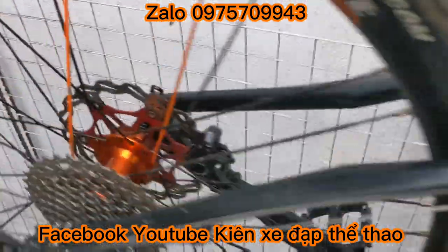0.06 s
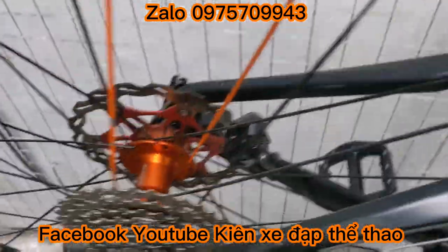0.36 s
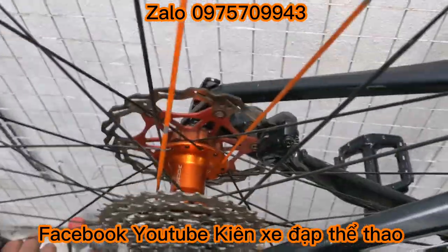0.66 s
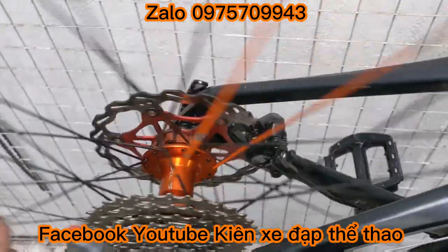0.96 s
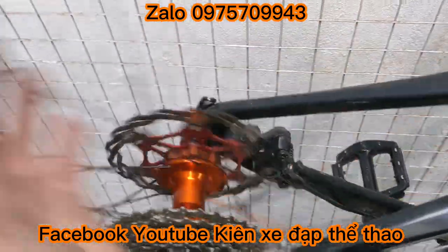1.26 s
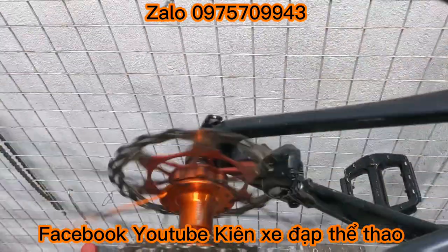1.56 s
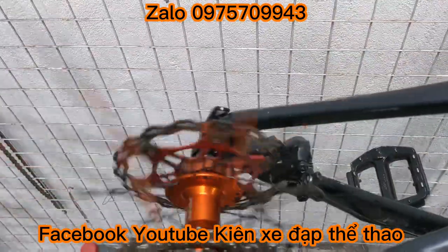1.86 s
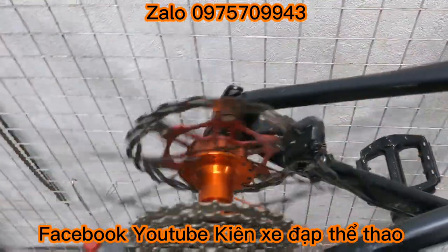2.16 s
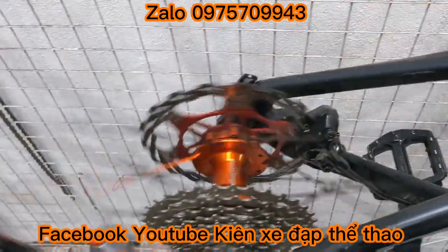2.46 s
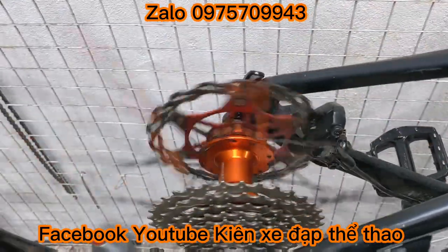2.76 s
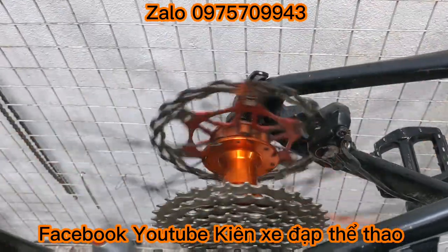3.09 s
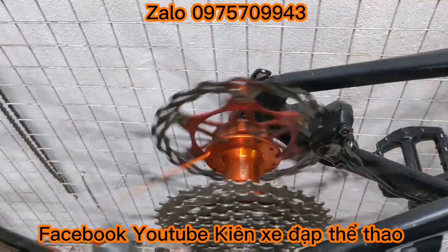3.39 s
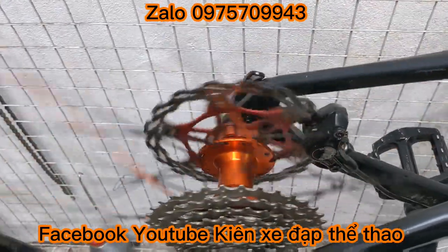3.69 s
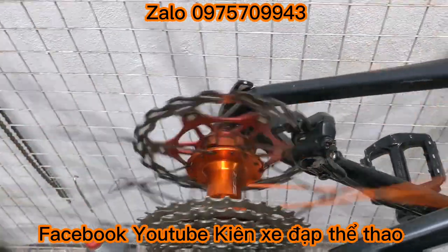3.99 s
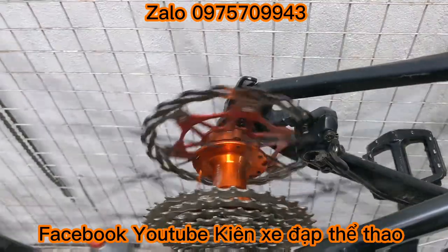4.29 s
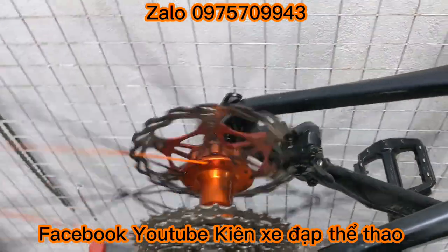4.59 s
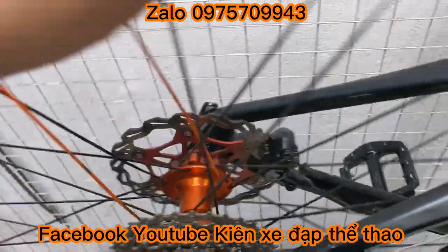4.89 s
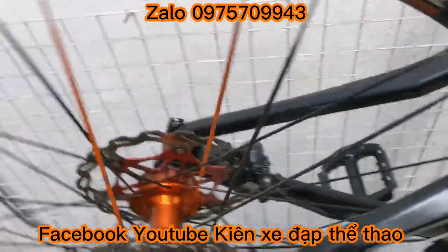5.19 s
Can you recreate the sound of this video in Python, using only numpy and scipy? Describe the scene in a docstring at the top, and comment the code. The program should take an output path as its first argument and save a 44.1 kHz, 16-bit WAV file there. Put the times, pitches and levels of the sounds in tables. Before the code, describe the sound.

For the first second a hand slides softly over a bicycle tyre, with a faint metallic swish and a small scrape and tick as the rear wheel starts to move. From about 1.1 seconds the freehub clicks, quickly speeding up into a bright, rapid metallic buzz by 1.3 seconds. Hollow knocks from the frame accompany the push, and dull handling bumps follow around 1.7 seconds. The wheel coasts, its crisp, ringing clicks gradually slowing and softening, with a few light thuds around 4 seconds. At about 4.7 seconds a hand brakes the wheel with a short knock, and the buzz breaks into a few separate, widening clicks with a faint steel scrape, the last near 5.3 seconds. Everything is heard close up in a small, hard room, with short reflections and a low rumble and faint hum underneath.

```python
"""Bicycle freehub coasting to a stop

A hand slides over the tyre and spins the rear wheel, close up. The freehub pawls snap once per tooth
of the evenly slowing wheel and ring the hub in a small, hard room, until the hand brakes it.
Hands bump the bike and the microphone; a low rumble and a faint hum sit underneath."""
import sys
import numpy as np
from scipy import signal
from scipy.fft import rfft, irfft, next_fast_len
from scipy.io import wavfile

SR = 44100
rng = np.random.default_rng(int(sys.argv[2]) if len(sys.argv) > 2 else 0)


def store_pcm(level_fs):
    """Save levels as 16-bit WAV."""
    pcm = np.round(np.clip(level_fs, -1, 1) * 32767).astype(np.int16)
    wavfile.write(sys.argv[1], SR, np.atleast_2d(pcm).T)


N = 240296
T = np.arange(N) / SR
SIDES = np.array([[.5], [-.5]])  # pan is left minus right, in dB

# single teeth as the hand pushes off and later brakes:
# (time [s], relative snap level [dB], relative knock level [dB], landing time of the pawls [s])
HAND_CLICKS = [(1.0595, -18.5, -31.5, 0.0033), (1.1252, -17.5, -28.5, 0.0053),
               (1.1747, -18.5, -25.5, 0.0039), (1.2159, -17.5, -26.5, 0.0032), (1.252, -16, -25.5, 0.0049),
               (1.285, -15.5, -21.5, .0053), (4.7415, -18.5, -28.5, .0027), (4.7942, -17.5, -34, 0.0024),
               (4.8561, -15.5, -32, .0032), (4.9447, -18, -33, 0.0026), (5.104, -19, -33.5, 0.0023),
               (5.2765, -23.5, -39, 0.0022), (5.2792, -18.5, -32, .0015)]
# bright snap of pawl on steel: (frequency [Hz], relative level [dB])
SNAP_EQ = [(150, -20.5), (600, -21), (1200, -16.5), (2800, -11), (4000, -14), (5200, -6.5), (5850, -10),
           (7000, -5), (8300, -7), (10500, 3), (12100, 5), (13400, 0), (14500, 3.5), (15350, -1.5)]
# how much the snap's colour varies from tooth to tooth: (frequency [Hz], scatter [dB])
RIPPLE = [(1000, 4), (4000, 10), (7000, 8), (9000, 5.5), (11000, 3.5)]
# bright ring of hub and sprockets, plus three faint low tones sounding with each click:
# (frequency [Hz], relative level [dB], t60 [s], pan [dB])
CLICK_MODES = [(245, -28, .15, 0), (485, -26, .14, 0), (724, -26, .12, 0), (4900, -16, .04, 0),
               (5295, -12.5, .055, -1), (5490, -14.5, .05, 1), (6300, -17, .03, -1), (7260, -17, .04, -2),
               (11250, -9, .035, -3), (12030, -8, .05, 2), (12250, -7, .07, 1), (12965, -2.5, .055, -1),
               (13720, 3.5, .07, -5), (13835, 3, .09, 4), (14660, -.5, .06, 3), (15280, -7, .05, 2)]
# hollow, damped hub shell: (frequency [Hz], relative level [dB], t60 [s], pan [dB])
SHELL_MODES = [(1329, -9.5, 0.023, -7), (1573, -11.5, .04, -2), (1858, -2, 0.028, -8.5),
               (2012, 0.5, 0.027, -0.5), (2163, 3, 0.059, -9), (2364, -0.5, 0.043, -1.5),
               (2480, -6, 0.033, -1), (2775, -14, .02, -5)]
# duller clatter of shell and spokes: (frequency [Hz], relative level [dB])
CLATTER_EQ = [(60, -29), (250, -10.5), (750, -6.5), (1100, -17.5), (1550, 1), (1900, 6.5), (2600, 14.5),
              (3200, -11), (5000, -2.5)]
# wall reflections, the top softened by air and plaster: (frequency [Hz], relative level [dB])
WALL_EQ = [(100, -10.5), (600, 4.5), (1200, 1), (2100, 13.5), (3500, 9.5), (5200, 10), (8000, 8.5),
           (11000, 9), (15000, 7)]
# hand sliding over the tyre: (time [s], relative level [dB], treble lift [dB])
RUSTLE_CURVE = [(0, -70, 18), (.11, -54, -6), (.2, -46.5, 1), (.5, -51, 6.5), (.71, -49.5, 8),
                (.8, -55.5, -13), (.96, -62, -7), (1.0, -42.5, -12), (1.2, -80, 0)]
# skin on rubber: (frequency [Hz], relative level [dB])
RUSTLE_EQ = [(200, -22), (700, -12), (1100, -1.5), (2000, 6.5), (3000, 1.5), (4400, 2), (7700, -4.5),
             (13000, -2.5), (15500, -11.5)]
# jolts as the hand drives or steadies the bike: (time [s], relative energy [dB])
JOLTS = [(1.222, -4), (1.2481, -9), (1.2853, -10.5), (1.323, -8), (1.354, -11), (4.146, -8.5), (4.178, -13),
         (4.193, -11)]
# frame and stand: (frequency [Hz], relative level [dB], t60 [s], pitch lift under pressure [Hz])
FRAME_MODES = [(126.6, 4.5, 0.12, 130), (560, -7.5, 0.038, 30)]
# hands on bike and microphone:
# (time [s], level [dB], pitch [Hz], swell [s], t60 [s], pan [dB], roughness [0-1])
HAND_BUMPS = [(1.382, -41, 133, 0.012, 0.31, 0.5, 0.3), (1.62, -37, 187, .005, 0.051, 10, 0.3),
              (1.641, -33, 600, 0.0022, 0.018, 4, .9), (1.647, -28, 161, 0.009, 0.045, 11, .1),
              (1.655, -27, 94, 0.0037, 0.095, 6, 0.33), (1.726, -36.5, 840, 0.0056, 0.19, 0, 1),
              (3.057, -41.5, 171, 0.013, 0.056, 16, .6), (3.881, -41.5, 137, 0.013, 0.043, 14, 0.5),
              (3.888, -37.5, 60, .01, 0.065, 2, 0.4), (4.725, -25, 957, 0.001, 0.021, 2, 0.33),
              (4.742, -40.5, 732, 0.0077, 0.15, 4, .5), (4.751, -41, 157, 0.022, 0.14, 4, .4),
              (4.855, -41, 61.7, 0.021, 0.12, -11, 0.2)]
# tick as the wheel starts to move: (time [s], relative energy [dB])
FIRST_TICK = [(.976, -9)]
# scrapes of the creeping mechanism: (time [s], level [dB], swell [s], t60 [s])
SCRAPES = [(.872, -47, 0.012, 0.25), (.931, -59, 0.0069, 0.23), (5.065, -44.5, 0.02, 1),
           (5.235, -55, 0.023, 1)]
# steel on steel: (frequency [Hz], relative level [dB])
SCRAPE_EQ = [(500, -9), (1700, 0.5), (2600, 4.5), (3700, 3), (5000, 0.5), (7000, -4.5), (11000, -4.5),
             (15000, -11)]
# thin steel resonances brought out by rubbing: (frequency [Hz], width [Hz], relative level [dB])
SWISH_MODES = [(11500, 900, -13), (12650, 450, -3), (13900, 350, 1)]
# room rumble: (frequency [Hz], relative level [dB])
ROOM_EQ = [(18, -19), (33, -16), (52, 1), (105, -4.5), (138, 5), (200, -4), (400, -8.5), (750, -11.5),
           (1100, -16.5), (2200, -17.5), (5000, -42.5), (15000, -25)]
# partials of the hum: (frequency [Hz], level [dB])
HUM_PARTIALS = [(137, -60), (365, -69), (724, -71)]


def freehub(snap_db=29, ring_db=24.5, knock_db=24, clatter_db=18, snap_pan_db=-2, clatter_pan_db=-4):
    """At each tooth the pawls snap down, knock the shell and set the hub ringing; the room answers."""
    clicks = np.vstack([HAND_CLICKS, coasting_clicks()])
    clicks = clicks[np.argsort(clicks[:, 0])]
    snaps, knocks, clatter, rings = np.zeros((4, 2, N))
    for time, db, body_db, landing_s in clicks:
        add(snaps, time, undb(db + snap_db) * pawl_snap(landing_s))
        add(rings, time + landing_s / 4, undb(db + ring_db) * ring(CLICK_MODES))
        add(knocks, time, undb(body_db + knock_db) * shell_knock(landing_s))
        add(clatter, time, undb(body_db + clatter_db) * dense_ring(t60=.11))
    slides = pawl_slides(clicks[:, 0], clicks[:, 1])
    # the hub sits nearer the right microphone
    steel = colour(snaps + slides, SNAP_EQ) * undb(snap_pan_db * SIDES) + rings
    shell = knocks + colour(clatter, CLATTER_EQ) * undb(clatter_pan_db * SIDES)
    tails = undb(-17) * reverb(steel, t60=.52) + undb(-8) * reverb(shell, t60=.67)
    walls = undb(-16) * colour(reverb(snaps, t60=.25), WALL_EQ)
    return steel + shell + tails + walls


def coasting_clicks(from_s=1.3186, to_s=4.72, teeth_per_s=34.794, slowing_per_s2=2.0534,
                    teeth_per_turn=30, jitter_s=.0003, landing_s=.0032, landing_scatter=.3):
    """Friction slows the wheel evenly, so its clicks spread out and soften; columns as in HAND_CLICKS."""
    length_s = to_s - from_s
    tooth = np.arange(teeth_per_s * length_s - slowing_per_s2 * length_s ** 2 / 2)
    rate = np.sqrt(teeth_per_s ** 2 - 2 * slowing_per_s2 * tooth)
    late, snap, body, landing = rng.standard_normal((len(tooth), 4)).T

    def level(full_speed_db, per_doubling_db, swing_db, loudest_turn):
        """The level follows the wheel's speed and swells once a turn."""
        swing = np.cos(2 * np.pi * (tooth / teeth_per_turn - loudest_turn))
        return full_speed_db + per_doubling_db * np.log2(rate / teeth_per_s) + swing_db * swing

    times = from_s + (teeth_per_s - rate) / slowing_per_s2 + jitter_s * late
    snap_db = level(-17.5, per_doubling_db=4, swing_db=.42, loudest_turn=.18) + 1.04 * snap
    knock_db = level(-28.5, per_doubling_db=3, swing_db=1.5, loudest_turn=.012) + 3 * body
    return np.column_stack([times, snap_db, knock_db, landing_s * np.exp(landing_scatter * landing)])


def pawl_snap(landing_s, pawls=4, scatter_s=.0003, uneven_db=.5, crack_db=-4):
    """The pawls land one after another, each with a short steel ring and a hard crack."""
    force, late = rng.standard_normal((2, pawls))
    click = np.zeros((2, SR // 14))
    for k, share in enumerate(unit(undb(uneven_db * force))):
        pawl = unit(dense_ring(t60=.069) + undb(crack_db) * dense_ring(t60=.0071))
        add(click, landing_s * k / pawls + scatter_s * np.sqrt(k) * late[k], share * pawl)
    return unit(vary_click_colour(click))


def vary_click_colour(click, step_hz=300, ceiling_db=4.5):
    """Each click gets its own random dips and mild peaks, so no two sound alike."""
    hz = np.arange(step_hz, SR / 2, step_hz)
    ripple_db = np.interp(hz, *np.transpose(RIPPLE)) * rng.standard_normal(len(hz))
    return colour(click, np.column_stack([hz, np.minimum(ripple_db, ceiling_db)]))


def pawl_slides(times, level_db, rise_s=.0016):
    """The scrape over the crest of a tooth swells up to the moment of the drop."""
    upcoming = np.minimum(np.searchsorted(times, T), len(times) - 1)
    wait = times[upcoming] - T
    swell = (wait > 0) * np.exp(-np.abs(wait) / rise_s)
    return swell * undb(level_db[upcoming]) * rng.standard_normal((2, N))


def shell_knock(landing_s, last_db=-2, bounce_s=.0083, bounce_db=-5, favour_db=2.5):
    """The shell answers the first pawl, the last and one bounce; each tooth favours its own modes."""
    modes = np.array(SHELL_MODES, float)
    modes[:, 1] += favour_db * rng.standard_normal(len(modes))
    bounce_at = bounce_s + landing_s * rng.standard_normal() / 2
    out = np.zeros((2, SR // 10))
    for time, db in [(0, 0), (landing_s, last_db), (bounce_at, bounce_db)]:
        add(out, time, undb(db) * ring(modes, detune=.02))
    return out / np.sqrt(np.sum(out ** 2) / 2)


def ring(modes, detune=.0018, uneven_db=2.5):
    """A struck part rings; each blow shares its force among the modes anew and detunes them slightly."""
    t = T[:SR // 10]
    hz, db, t60, pan_db = np.transpose(modes)[:, :, None]
    bend, share = rng.standard_normal((2, len(hz), 1))
    waves = np.exp(2j * np.pi * hz * (1 + detune * bend) * t) * fade(t, t60)
    gains = (undb(db + uneven_db * share) / np.sqrt(t60)).T * undb(pan_db.T * SIDES)
    phases = np.exp(2j * np.pi * rng.random((2, len(hz))))
    sound = ((gains * phases) @ waves).imag
    return sound / np.sqrt(np.sum(sound ** 2) / 2)


def dense_ring(t60):
    """Countless close modes die together, different at each microphone."""
    t = T[:SR // 16]
    return unit(rng.standard_normal((2, len(t))) * fade(t, t60))


def tyre_rustle(slips_per_s=2500, uneven_db=1, slip_t60=.09, pan_db=-2, split_hz=6000):
    """A hand slides over the tyre: a dense patter of tiny slips, brighter as it gathers speed."""
    times, level_db, treble_db = np.transpose(RUSTLE_CURVE)
    slips = (rng.random(N) < slips_per_s / SR) * undb(uneven_db * rng.exponential(size=N))
    hiss = colour(friction(slips, slip_t60), RUSTLE_EQ)
    low = butter(hiss, 1, split_hz, "low")
    tilted = low + (hiss - low) * undb(np.interp(T, times, treble_db))
    return tilted / hiss.std() * undb(np.interp(T, times, level_db) + pan_db * SIDES)


def frame_thuds(settle_s=.011, lowest_hz=90, room_db=-13, room_t60=.3):
    """Each jolt gives a hollow knock whose pitch sinks as the pressure eases."""
    t = T[:SR // 5]
    eased = settle_s * (1 - np.exp(-t / settle_s))
    note = unit(sum(undb(db) * unit(np.sin(2 * np.pi * (hz * t + lift_hz * eased)) * fade(t, t60))
                    for hz, db, t60, lift_hz in FRAME_MODES))
    out = np.zeros((2, N))
    for time, db in JOLTS:
        add(out, time, undb(db) * note[None])
    out += undb(room_db) * reverb(out, room_t60)
    return butter(out, 3, lowest_hz, "high")  # thin tubes radiate no deep bass


def hand_bumps(rub_ratio=1.94, lead_s=.1):
    """Each soft contact swells into one damped note, with a rustle of skin around it."""
    out = np.zeros((2, N))
    t = T[:SR // 3] - lead_s
    for time, db, hz, swell_s, t60, pan_db, rough in HAND_BUMPS:
        rub = butter(rng.standard_normal(len(t)), 2, [hz / rub_ratio, hz * rub_ratio], "band")
        note = np.sqrt(2 * (1 - rough)) * np.sin(2 * np.pi * hz * t) + np.sqrt(rough) * rub / rub.std()
        add(out, time - lead_s, swell_and_fade(t, swell_s, t60) * note * undb(db + pan_db * SIDES))
    return out


def first_tick(ring_t60=.039, room_db=-3, room_t60=.4):
    """The wheel starts to move with one small tick."""
    out = np.zeros((2, N))
    for time, db in FIRST_TICK:
        add(out, time, undb(db) * dense_ring(ring_t60))
    return colour(out + undb(room_db) * reverb(out, room_t60), SCRAPE_EQ)


def steel_scrapes(slips_per_s=1500, slip_t60=.05):
    """Steel creeps over steel in short runs of tiny slips."""
    slips = (rng.random(N) < slips_per_s / SR) * rng.exponential(size=N)
    grit = colour(friction(slips, slip_t60), SCRAPE_EQ)
    level = sum(undb(db) * swell_and_fade(T - time, swell_s, t60) for time, db, swell_s, t60 in SCRAPES)
    return level * grit / grit.std()


def metallic_swish(peak_s=.55, swell_s=.13, gain_db=-55):
    """A bright metallic swish swells and fades as rubbing on the tyre rings hub and rotor."""
    noise, out = rng.standard_normal((2, N)), 0
    for hz, width_hz, db in SWISH_MODES:
        band = signal.lfilter(*signal.iirpeak(hz, hz / width_hz, fs=SR), noise)
        out = out + undb(db) * band / band.std()
    return out * undb(gain_db) * np.exp(-((T - peak_s) / swell_s) ** 2)


def distant_tone(hz=478, width_hz=65, peak_s=2.85, peak_db=-51.5, rise_db_per_s=34, fall_db_per_s=67):
    """A narrow, wavering note swells and fades far behind the wheel."""
    note = butter(rng.standard_normal(N), 2, [hz - width_hz / 2, hz + width_hz / 2], "band")
    since = T - peak_s
    return note / note.std() * undb(peak_db + np.minimum(rise_db_per_s * since, -fall_db_per_s * since))


def room_tone(rumble_db=-52, apart_hz=900, bass_side_db=-9, pan_db=.5, waver_db=2):
    """Low room rumble, alike at both microphones in the bass, and a faint, wavering hum."""
    mid, side = colour(rng.standard_normal((2, N)), ROOM_EQ)
    side = undb(bass_side_db) * side + (1 - undb(bass_side_db)) * butter(side, 1, apart_hz, "high")
    hum = sum(np.sqrt(2) * undb(db + waver_db * waver()) * np.sin(2 * np.pi * hz * T + 2 * waver())
              for hz, db in HUM_PARTIALS)
    return (undb(rumble_db) * (mid + 2 * SIDES * side) + hum) * undb(pan_db * SIDES)


def reverb(x, t60, build_s=.016):
    """Hard walls return a diffuse tail that builds up as the first echoes arrive."""
    t = T[:SR // 3]
    tail = unit(rng.standard_normal((2, len(t))) * fade(t, t60) * np.clip(t / build_s, 0, 1) ** 2)
    return signal.oaconvolve(x, tail, axes=-1)[:, :N]


def mono_bass(x, apart_hz=600):
    """Long waves reach both microphones alike: the two sides differ only above the bass."""
    mid = x.mean(axis=0)
    return mid + butter(x - mid, 1, apart_hz, "high")


def friction(slips, t60):
    """Every slip leaves a dying burst of noise; their energies add."""
    energy = signal.lfilter([1], [1, -fade(1 / SR, t60) ** 2], slips ** 2)
    return np.sqrt(energy) * rng.standard_normal((2, N))


def waver(per_s=7):
    """A slow random drift with a spread of about one."""
    steps = rng.standard_normal(int(T[-1] * per_s) + 2)
    return np.interp(T * per_s, np.arange(len(steps)), steps)


def colour(x, points):
    """Causal EQ through (frequency [Hz], level [dB]) points; white noise keeps its power."""
    size = next_fast_len(2 * x.shape[-1], True)
    size += size % 2
    hz, db = np.transpose(points)
    bins_hz = np.arange(size // 2 + 1) * SR / size
    gain = undb(np.interp(np.log(bins_hz + 1), np.log(hz), db))
    cepstrum = irfft(np.log(gain / np.sqrt(np.mean(gain ** 2))))
    cepstrum[1:size // 2] *= 2  # minimum phase keeps attacks sharp
    cepstrum[size // 2 + 1:] = 0
    return irfft(rfft(x, size) * np.exp(rfft(cepstrum)))[..., :x.shape[-1]]


def butter(x, order, hz, kind):
    """Low-, high- or band-pass filter."""
    return signal.sosfilt(signal.butter(order, hz, kind, fs=SR, output="sos"), x)


def swell_and_fade(t, swell_s, t60):
    """Envelope that rises to its peak at t = 0, then decays."""
    return np.exp(np.minimum(t, 0) / swell_s) * fade(np.maximum(t, 0), t60)


def fade(t, t60):
    """Decay that loses 60 dB in t60 seconds."""
    return np.exp(-np.log(1000) * t / t60)


def undb(db):
    """Decibels to gain."""
    return 10 ** (np.asarray(db) / 20)


def unit(x):
    """Scale each row to an energy of one."""
    return x / np.sqrt(np.sum(x ** 2, axis=-1, keepdims=True))


def add(out, time, sound):
    """Mix a sound in from a time on."""
    start = max(int(time * SR), 0)
    part = sound[:, :max(out.shape[1] - start, 0)]
    out[:, start:start + part.shape[1]] += part


def scene():
    """Freehub up front, handling noises around it, the room underneath."""
    wheel = mono_bass(freehub()) + first_tick() + tyre_rustle() + metallic_swish() + steel_scrapes()
    return wheel + frame_thuds() + hand_bumps() + room_tone() + distant_tone()


def record(dry, low_cut_hz=38, top_hz=15450):
    """The microphone drops the deepest rumble, rounds the highest peaks and cuts the top."""
    lean = butter(dry, 2, low_cut_hz, "high")
    rounded = 2 * np.tanh(lean / 2)
    return signal.sosfilt(signal.ellip(8, .2, 70, top_hz, fs=SR, output="sos"), rounded)


dry = scene()
out = record(dry)
store_pcm(out)
```